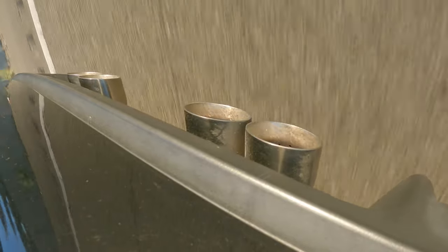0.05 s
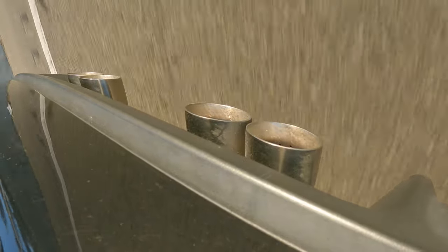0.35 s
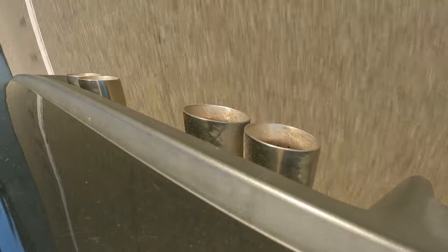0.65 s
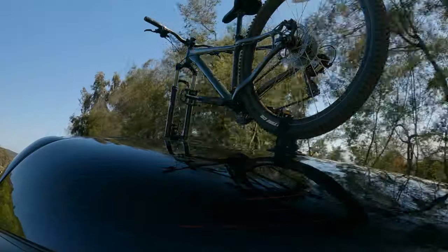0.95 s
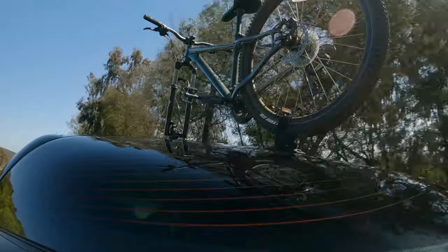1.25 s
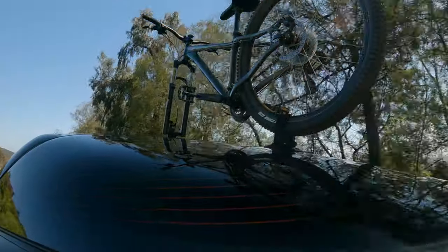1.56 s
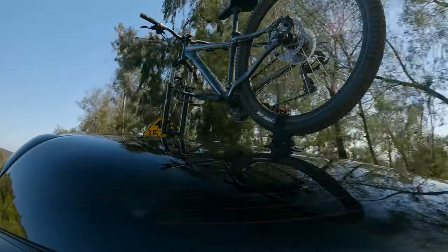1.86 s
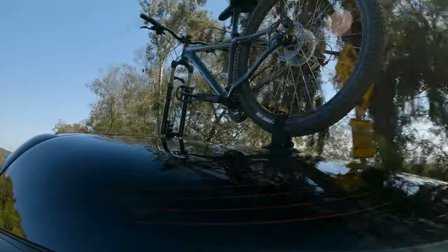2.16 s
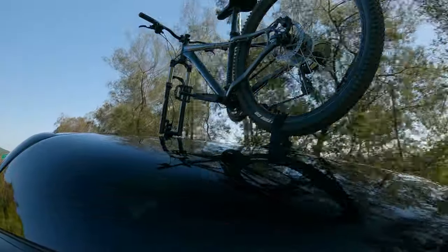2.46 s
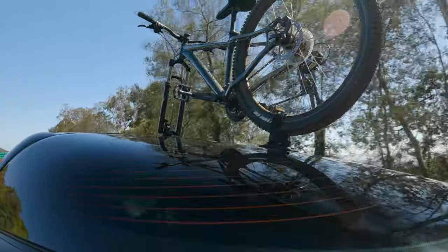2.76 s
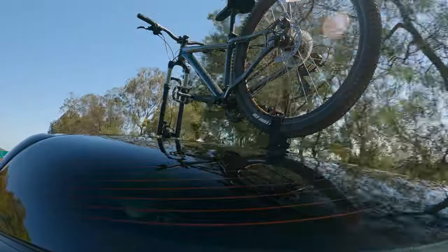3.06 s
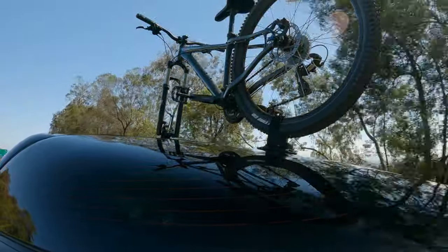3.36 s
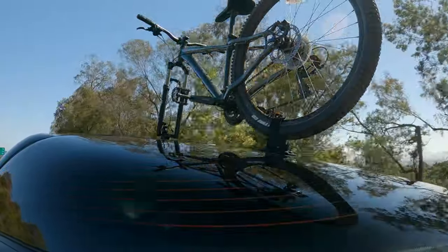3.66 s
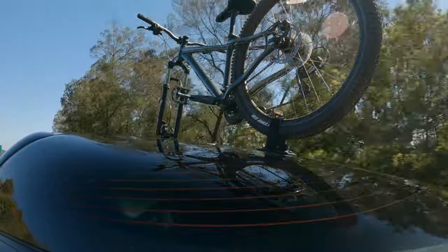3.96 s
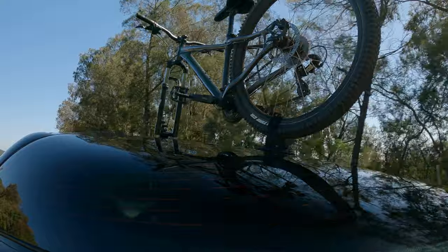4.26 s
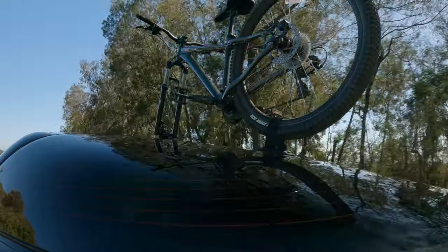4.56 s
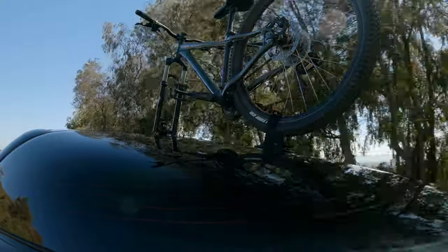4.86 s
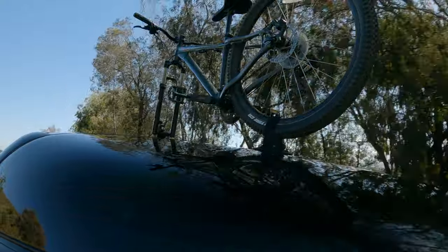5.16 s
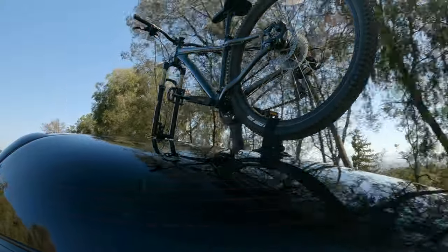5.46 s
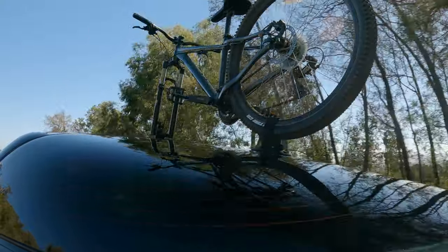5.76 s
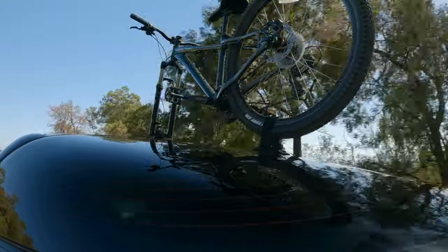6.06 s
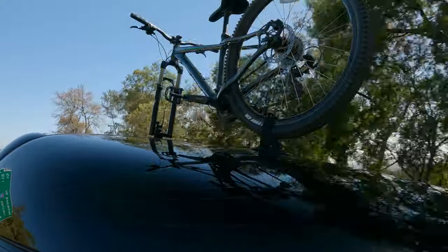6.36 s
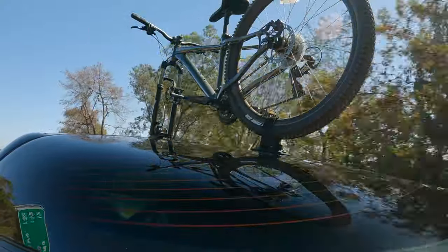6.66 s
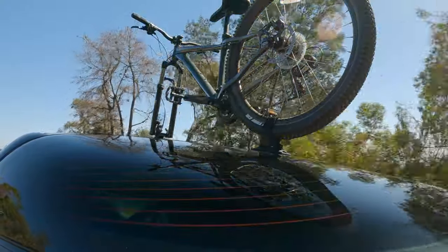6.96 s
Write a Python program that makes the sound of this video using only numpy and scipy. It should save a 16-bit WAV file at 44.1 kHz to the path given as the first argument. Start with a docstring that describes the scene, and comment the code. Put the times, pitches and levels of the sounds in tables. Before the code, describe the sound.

Brief, throaty car exhaust gives way to gusty wind rumbling and tearing at a microphone mounted by the roof at speed.

```python
"""V8 sports car, tailpipes then roof

Camera microphone, mounted on the car. Close over the tailpipes, uneven firings burble through the
pipes, the tips spit and the engine eases off a little. With a click the position changes to the roof,
in the open airstream: eddies buffet the microphone ports and grit ticks on the housing. Gusts drive
the wind's tearing and hiss, the smaller eddies following them most."""
import sys
import numpy as np
from scipy import signal
from scipy.fft import rfft, irfft, next_fast_len
from scipy.io import wavfile
from scipy.ndimage import uniform_filter1d, map_coordinates

SR = 44100
rng = np.random.default_rng(int(sys.argv[2]) if len(sys.argv) > 2 else 0)


def store_pcm(level_fs):
    """Save levels as 16-bit WAV."""
    pcm = np.round(np.clip(level_fs, -1, 1) * 32767).astype(np.int16)
    wavfile.write(sys.argv[1], SR, np.atleast_2d(pcm).T)


N = 309141

# Spectra give shape only. Levels and peaks are read before the trims in the functions.
# crankshaft speed: t/s, speed/(turns per s)
CRANK_SPEED = [(0.0, 36.8), (0.13, 36.4), (0.202, 36.5), (0.78, 35.0)]
# cylinders in firing order, each with its own path to the tips: pulse size, lateness/firing intervals
CYLINDERS = [(0.87, 0.015), (1.4, 0.247), (0.41, -0.22), (0.81, 0.09), (0.81, -0.0017), (1.33, 0.227),
             (0.82, -0.078), (1.2, 0.011)]
# resonances of muffler and tailpipes: f/Hz, level/dB
PIPE_SPECTRUM = [(15, -59), (25, -4.5), (48, -6.5), (97, 2), (149, -7), (182, 1), (229, -5), (275, -1),
                 (395, -11.5), (437, -25.5), (660, -10.5), (753, -14), (832, -29), (998, -22.5),
                 (1300, -45), (1690, -77), (2860, -120)]
# gas leaving the tips: f/Hz, level/dB
RASP_SPECTRUM = [(530, -32), (900, -7), (1040, -7), (1320, -11), (1740, -12), (1960, -15.5), (2120, -19),
                 (2810, -26.5), (3450, -29), (3890, -34), (4620, -33.5), (12000, -59.5), (15600, -101),
                 (22000, -120)]
# the exhaust swelling and sagging: t/s, boom level/dB, rasp level/dB
EXHAUST_SWELLS = [(0.02, 0.5, 1), (0.12, 1.5, 0), (0.17, -0.5, -1.5), (0.24, 2, -3), (0.33, -2.5, -1.5),
                  (0.39, 1.5, 1.5), (0.55, 0, -3), (0.68, -0.5, 1.5), (0.77, -1, -2.5)]
# engine orders on pipe resonances: t/s, 3rd order level/dB, 8th order level/dB
DRONE_LEVELS = [(0.0, -18.5, -8.5), (0.06, -15, -23.5), (0.15, -16, -24), (0.19, -26, -19),
                (0.235, -14, -29), (0.3, -39.5, -28), (0.35, -18.5, -10), (0.41, -14, -28.5),
                (0.47, -7.5, -16.5), (0.56, -27.5, -34), (0.6, -33, -16.5), (0.65, -10, -10.5),
                (0.72, -30, -18), (0.78, -28, -19)]
# hard firings that bark in the tailpipes: t/s, peak/dB
BARKS = [(0.102, -16.5), (0.137, -22), (0.186, -12), (0.271, -12), (0.304, -16), (0.549, -10), (0.583, -13),
         (0.752, -15.5)]
# tone of a bark: f/Hz, level/dB
BARK_SPECTRUM = [(400, -24.5), (580, -1), (740, 7.5), (900, -15), (1500, -18.5), (3000, -50), (8000, -100)]
# stereo image over the tailpipes: f/Hz, left-right likeness, left minus right/dB, left lead/rad
AT_PIPES = [(100, 0.98, -1, 0.0), (706, 1, -4, -0.15), (2400, 0.89, -3.5, -0.6), (4500, 0.7, -2.5, -.35),
            (10000, .9, 0, 0.0)]

# spits from the exhaust tips, then grit on the roof: t/s, tick peak/dB, glassy edge peak/dB
TICKS = [(0.1384, -44.5, -64), (0.221, -43, -55.5), (0.3904, -46.5, -64), (0.501, -36, -67.5),
         (0.6664, -42, -61), (0.9233, -37, -69), (0.9592, -37.5, -74), (1.5196, -40, -67),
         (1.533, -38.5, -63), (1.5798, -40.5, -70), (1.7095, -31, -71), (1.8731, -42.5, -65),
         (1.9042, -38.5, -66), (1.9266, -41.5, -69), (2.0122, -35.5, -53), (2.0636, -42.5, -62),
         (2.073, -36.5, -65), (2.2735, -39.5, -70), (2.4564, -38, -68), (2.5396, -40.5, -69),
         (2.7701, -42.5, -73), (3.104, -38, -73), (3.4002, -41, -70), (3.5189, -36.5, -66),
         (3.811, -39, -67), (3.9519, -38.5, -68), (4.116, -40, -60), (4.4245, -41.5, -71),
         (4.7832, -42, -69), (4.81, -30.5, -68), (5.4263, -41, -72), (6.1825, -37, -64),
         (6.311, -40.5, -68), (6.4157, -38.5, -64)]
# tone of a tick and its rattle: f/Hz, level/dB
TICK_SPECTRUM = [(1500, -8.5), (3500, 3.5), (5500, 10), (7600, 3), (8600, -13), (12000, -31),
                 (14000, -56.5)]
# glassy edge of a tick: f/Hz, level/dB
EDGE_SPECTRUM = [(4000, -22.5), (7500, -2.5), (9500, -1), (12000, -6.5), (13500, -29)]
# click at the change of position: t/s, peak/dB
CLICK = [(0.7908, -15)]
# tone of that click: f/Hz, level/dB
CLICK_SPECTRUM = [(300, 7), (1500, 6), (3000, 7.5), (5000, 2), (10000, -3), (16000, -8)]

# stereo image on the roof: f/Hz, left-right likeness, left minus right/dB, left lead/rad
ON_ROOF = [(50, 0.26, -4, 1), (110, 0.48, -2, -0.23), (203, 0.4, -7, -1.03), (336, 1, -9.5, -1.24),
           (720, 0.86, -6, -1.5), (1270, 1, -0.5, -1.57), (3200, 0.7, 5, -1.55), (4100, 0.62, 10, -1.3),
           (4900, .38, 4, -1.4), (6300, .6, 3, 0.51), (12000, .55, 2, .1)]
# gusts passing the ports, about the usual airflow: t/s, level/dB
GUSTS = [(0.83, -0.5), (0.88, 4), (1.02, -4.5), (1.05, 4.5), (1.15, -7.5), (1.19, 1), (1.29, 6.5),
         (1.58, 2), (1.79, -1.5), (1.83, -6), (1.87, 0), (2.05, -2), (2.07, 5), (2.1, 0.5), (2.14, 6),
         (2.18, 3.5), (2.22, -0.5), (2.3, 2), (2.37, -1.5), (2.42, 4), (2.455, -9.5), (2.475, -1),
         (2.495, -19.5), (2.515, -4), (2.58, -5.5), (2.65, 2.5), (2.72, 1.5), (2.95, -1), (2.98, 1.5),
         (3.02, -3.5), (3.09, 2), (3.235, -0.5), (3.275, 9), (3.31, -5), (3.37, 0), (3.405, 7), (3.44, 2),
         (3.48, -0.5), (3.58, 2), (3.69, -0.5), (3.8, 4.5), (3.84, -1), (3.9, -2.5), (3.99, 3),
         (4.26, -0.5), (4.28, 4.5), (4.35, -1), (4.41, 4.5), (4.48, 1), (4.73, 5), (4.77, -0.5),
         (4.95, 4.5), (4.97, 0), (5.0, 7), (5.05, 0.5), (5.12, 8.5), (5.15, -3.0), (5.22, 4), (5.43, -1),
         (5.68, 1.5), (5.76, 7), (5.82, 6.5), (5.84, -0.5), (5.94, -2), (5.98, 5), (6.04, 8.5), (6.09, 5),
         (6.135, 7.5), (6.165, -7.5), (6.19, 0), (6.33, -3), (6.35, 4), (6.4, -3.5), (6.66, 5), (6.75, -3),
         (6.83, 7.5), (6.85, 3.5), (6.99, -1)]
# turbulence right at the ports: f/Hz, level/dB
AIR_SPECTRUM = [(11, -25.5), (18, -4.5), (53, 4), (181, -3), (276, -6), (778, -16.5), (1310, -21.5),
                (2840, -38), (5000, -39), (6500, -84.5), (11000, -120)]
# deep rumble of the largest eddies: t/s, level/dB
RUMBLE_LEVELS = [(0.83, -21.5), (1.03, -24), (1.09, -19), (1.19, -23.5), (1.54, -21), (1.61, -27.5),
                 (1.66, -21.5), (1.87, -22), (2.02, -22), (2.09, -24.5), (2.32, -22), (2.37, -25.5),
                 (2.58, -20), (2.68, -23.5), (2.99, -21.5), (3.49, -21), (3.53, -27.5), (3.6, -22.5),
                 (3.76, -24.5), (3.83, -19), (3.99, -27), (4.17, -22), (4.49, -23), (4.57, -23),
                 (4.62, -26), (4.75, -20), (4.9, -23.5), (5.06, -19.5), (5.1, -24), (5.23, -19),
                 (5.31, -25.5), (5.66, -20.5), (5.98, -24.5), (6.14, -20.5), (6.31, -22.5), (6.35, -28.5),
                 (6.39, -19.5), (6.66, -24), (6.85, -18.5), (6.99, -22)]
# buffeting of the middle-sized eddies: t/s, level/dB
BUFFET_LEVELS = [(0.83, -21.5), (1.01, -23.5), (1.04, -22.5), (1.13, -20.5), (1.18, -25), (1.42, -23),
                 (1.45, -18), (1.49, -21.5), (1.58, -19.5), (1.69, -22), (1.75, -25), (1.8, -22),
                 (1.95, -19.5), (2.03, -22), (2.19, -21), (2.38, -21), (2.4, -29.5), (2.43, -22),
                 (2.48, -23.5), (2.51, -24.5), (2.61, -26.5), (2.64, -22.5), (2.67, -24), (2.73, -22.5),
                 (2.99, -20), (3.04, -28), (3.08, -20.5), (3.32, -21.5), (3.56, -22), (3.58, -23),
                 (3.73, -20.5), (3.77, -24), (3.82, -20.5), (3.92, -24), (3.98, -28.5), (4.07, -24.5),
                 (4.11, -20.5), (4.2, -25.5), (4.23, -22.5), (4.38, -21.5), (4.64, -22), (4.69, -23),
                 (4.8, -18.5), (4.9, -25), (4.92, -22.5), (5.22, -21), (5.3, -22), (5.4, -22.5),
                 (5.56, -20), (5.74, -24), (5.88, -20.5), (5.92, -23), (6.13, -21.0), (6.17, -22),
                 (6.24, -19.5), (6.33, -23.5), (6.36, -18.5), (6.4, -24), (6.44, -20.5), (6.52, -20),
                 (6.55, -33), (6.6, -19), (6.64, -24), (6.72, -25), (6.82, -22), (6.89, -20.5),
                 (6.99, -23.5)]
# the finest, hissing part of the flow: f/Hz, level/dB
HISS_SPECTRUM = [(600, -8.5), (1500, 9.5), (2500, 7.5), (3200, 4), (4000, -2), (6000, -11), (7700, -17.5),
                 (8400, -23), (10300, -32), (12000, -41), (13200, -58.5)]
# tyres and distant air: f/Hz, level/dB
ROAD_SPECTRUM = [(700, 0.5), (4000, -2), (7700, -3.5), (8400, -13), (10500, -20), (13000, -46)]
# tiny snaps in the wind: f/Hz, level/dB
CRACKLE_SPECTRUM = [(500, 0), (1500, 5.5), (4000, 3), (7600, -1), (8600, -9.5), (11000, -18),
                    (13500, -41.5)]
# strong eddies hitting the ports: t/s, slap peak/dB, tearing peak/dB, tearing rise/s
STRONG_EDDIES = [(0.914, -21, -18, 0.012), (0.958, -13, -23, 0.00098), (0.985, -14.5, -20.5, 0.0012),
                 (1.049, -21, -28.5, 0.0067), (1.116, -10, -22.5, 0.00088), (1.257, -19.5, -18, .0012),
                 (1.786, -15, -19.5, 0.00078), (1.874, -18.5, -20, .0012), (2.422, -16, -20.5, 0.0056),
                 (2.440, -11, -19.5, 0.0013), (2.457, -11.5, -32, 0.0013), (2.474, -14.5, -19.5, .003),
                 (2.511, -20.5, -26, .003), (2.556, -10.5, -28, 0.0027), (2.623, -18.5, -25, .0012),
                 (2.765, -14.5, -23.5, 0.00098), (3.063, -15, -21, 0.0053), (3.146, -18, -22, 0.0022),
                 (4.227, -15, -21.5, .001), (4.362, -22, -17, .0012), (4.404, -15, -16.5, 0.0016),
                 (4.572, -24, -19, .002), (5.594, -22, -26, 0.0013), (6.242, -19, -19.5, 0.0013),
                 (6.351, -21.5, -19.5, .0012), (6.559, -15, -22, .002), (6.96, -16, -30.5, 0.0012)]
# large, slow eddies that thump without tearing: t/s, peak/dB
SLOW_EDDIES = [(1.348, -11.5), (1.452, -14), (1.574, -8), (1.937, -12), (2.461, -13), (3.186, -11),
               (3.544, -11.5), (3.947, -11), (3.989, -14.5), (4.031, -11.5), (4.113, -10), (4.161, -10),
               (4.22, -13), (4.282, -9.5), (4.497, -15), (4.632, -13), (5.491, -9.5), (5.884, -13.5),
               (6.346, -15.5), (6.71, -8), (6.757, -12)]


def amp(db):
    """Decibels to gain."""
    return 10 ** (np.asarray(db) / 20)


def unit(x):
    """Scaled to rms 1."""
    return x / np.sqrt(np.mean(x ** 2) + 1e-20)


def along(table, hz):
    """Each column after the frequency, read at hz on a log axis."""
    f, *columns = np.transpose(table)
    return [np.interp(np.log(hz + 1), np.log(f + 1), column) for column in columns]


def curves(table):
    """Each column after the time, one value per sample."""
    times, *columns = np.transpose(table)
    return [np.interp(np.arange(N) / SR, times, column) for column in columns]


def wobble(rate):
    """A smooth random curve of rms 1 with rate knots a second."""
    knots = rng.standard_normal(int(N * rate / SR) + 4)
    return unit(map_coordinates(knots, [np.arange(N) * rate / SR]))


def flutter(rate):
    """A wobble with its widest swings and slow drift taken out, rms 1."""
    quick = np.clip(wobble(rate), -2.2, 2.2)
    return unit(quick - uniform_filter1d(quick, size=SR // 14))


def steady(noise, window_s=0.06):
    """Evens out the slow swells of a noise and keeps its quick flutter, rms 1."""
    power = np.mean(np.atleast_2d(noise) ** 2, axis=0)
    for _ in range(2):
        power = uniform_filter1d(power, size=int(window_s * SR))
    return unit(noise / np.sqrt(np.abs(power) + 1e-9))


def coloured(x, spectrum):
    """x through a minimum-phase filter with the gains of a table of f/Hz, level/dB."""
    size = 2 * next_fast_len(N // 2 + SR // 8)
    gain_db, = along(spectrum, np.fft.rfftfreq(size, 1 / SR))
    cepstrum = irfft(np.log(amp(gain_db) + 1e-6))
    cepstrum[1:size // 2] *= 2
    cepstrum[size // 2 + 1:] = 0
    return irfft(rfft(x, size) * np.exp(rfft(cepstrum)), size)[..., :N]


def rush(spectrum, flutter_db=0):
    """A pair of unrelated coloured noises that flutter together, rms 1."""
    gain = amp(np.clip(flutter_db, -8.5, 10))
    return unit(coloured(rng.standard_normal((2, N)) * gain, spectrum))


def turbulence(low_hz, high_hz, flutter_db=0):
    """The eddies of one range of sizes, as a pair of noises, rms 1."""
    hz = np.geomspace(10, SR / 2, num=120)
    air_db, = along(AIR_SPECTRUM, hz)
    band_db = -10 * np.log10((1 + (low_hz / hz) ** 8) * (1 + (hz / high_hz) ** 8))
    return steady(rush(np.column_stack([hz, air_db + band_db]), flutter_db))


def bursts(times, peaks_db, noise, rise_s, unshared=0):
    """A short burst of a noise pair at each time; unshared scales the second noise."""
    noise = noise * [[1], [unshared]]
    t = np.arange(SR // 10) / SR
    track = np.zeros((2, N + len(t)))
    for time, peak_db, rise in zip(times, peaks_db, np.broadcast_to(rise_s, len(times))):
        start = max(round(time * SR), 0)
        envelope = (t / rise * np.exp(-t / rise)) ** 2
        burst = envelope * np.take(noise, start + np.arange(len(t)), axis=1, mode="wrap")
        track[:, start:start + len(t)] += amp(peak_db) * burst / np.abs(burst).max()
    return track[:, :N]


def snaps(times, peaks_db, spectrum):
    """One dry impulse at each time, in the shared signal of a pair."""
    spikes = np.bincount(np.round(times * SR).astype(int), amp(peaks_db), N)[:N]
    peak = np.abs(coloured(signal.unit_impulse(N), spectrum)).max()
    return np.array([coloured(spikes, spectrum) / peak, np.zeros(N)])


def microphone(pair, place):
    """Mixes a shared and an unshared signal into left and right, keeping the level of their middle."""
    size = next_fast_len(N + SR // 4)
    likeness, balance_db, lead = along(place, np.fft.rfftfreq(size, 1 / SR))
    angle = np.arccos(np.clip(likeness, 0, 1)) / 2
    shared, unshared = rfft(pair, size) * [np.cos(angle), np.sin(angle)]
    lean = amp(balance_db / 2) * np.exp(1j * lead / 2)
    left, right = (shared + unshared) * lean, (shared - unshared) / lean
    middle = np.hypot(np.cos(angle) * abs(lean + 1 / lean), np.sin(angle) * abs(lean - 1 / lean)) / 2
    return irfft(np.array([left, right]) / middle, size)[:, :N]


def drone(turns, sway_rad=0.2):
    """Three engine orders drone on pipe resonances; uneven firing unsettles their phase."""
    sway = sway_rad * np.array([wobble(21), wobble(30), wobble(30)])
    third, fifth, eighth = np.sin(2 * np.pi * np.outer([3, 5, 8], turns) + sway)
    third_db, eighth_db = curves(DRONE_LEVELS)
    fifth_db = -20 + 3 * wobble(24)
    return amp(third_db - 7) * third + amp(fifth_db) * fifth + amp(eighth_db - 0.1) * eighth


def exhaust(jitter=0.024, scatter_db=1.9, puff_s=0.0032):
    """Close over the tailpipes: four uneven firings a turn boom in the pipes and puff gas from the tips."""
    speed, = curves(CRANK_SPEED)
    turns = np.cumsum(speed) / SR
    firings = 4 * turns
    firing = np.arange(int(firings[-1]))
    size, lateness = np.array(CYLINDERS)[firing % len(CYLINDERS)].T
    timing, strength = rng.standard_normal((len(firing), 2)).T
    arrivals = np.interp(firing + lateness + jitter * timing, firings, np.arange(N)).astype(int)
    pulses = np.bincount(arrivals, size * amp(scatter_db * strength), N)
    # each pulse drives a puff of turbulent gas that dies before the next
    puffs = unit(signal.lfilter([1], [1, -np.exp(-1 / (puff_s * SR))], pulses))
    boom_db, rasp_db = curves(EXHAUST_SWELLS)
    ringing = unit(coloured(pulses, PIPE_SPECTRUM))
    boom = amp(boom_db - 13.5) * steady(ringing + rush(PIPE_SPECTRUM, 0.5 * puffs))
    rasp = amp(rasp_db - 32.5) * steady(rush(RASP_SPECTRUM, puffs + wobble(45)))
    barks = bursts(*np.transpose(BARKS), rush(BARK_SPECTRUM), rise_s=0.0023)
    return microphone(boom + rasp + barks + drone(turns), AT_PIPES)


def ticks():
    """Small sharp ticks: spits from the exhaust tips, then grit on the camera housing on the roof."""
    times, peak_db, edge_db = np.transpose(TICKS)
    attacks = snaps(times, peak_db + 2.5, TICK_SPECTRUM)
    rattles = bursts(times, peak_db - 3.5, rush(TICK_SPECTRUM), rise_s=0.0007, unshared=0.5)
    edges = bursts(times, edge_db + 5, rush(EDGE_SPECTRUM), rise_s=0.0008, unshared=0.5)
    return microphone(attacks + rattles + edges, ON_ROOF)


def click():
    """One sharp click, dead centre, as the microphone position changes."""
    time, peak_db = CLICK[0]
    snap = coloured(signal.unit_impulse(N, round(time * SR)), CLICK_SPECTRUM)
    return amp(peak_db + 2.5) * snap / np.abs(snap).max()


def wind():
    """On the roof, air on the ports: large eddies rumble and carry small ones that tear and hiss."""
    gust_db, = curves(GUSTS)
    buffet_db, = curves(BUFFET_LEVELS)
    rumble_db, = curves(RUMBLE_LEVELS)
    chop = amp(np.minimum(-0.54 * gust_db, 3))  # strong flow rushes smoothly, weak flow breaks up
    flow_db = gust_db + 0.62 * wobble(20)
    # shared flutter keeps eddies of different sizes in step
    swirl = 0.66 * flutter(45) + 2.0 * flutter(120) + 5.03 * flutter(320)
    lumps = 0.67 * flutter(30)
    rumble = amp(rumble_db - 1.5) * turbulence(21, 142, 1.3 * flutter(25))
    buffet_flutter_db = 0.44 * swirl + lumps + 1.43 * flutter(70)
    buffet = amp(buffet_db - 2.5) * turbulence(140.6, 672, buffet_flutter_db)
    tear_flutter_db = 0.46 * chop * swirl + 1.1 * lumps + 1.3 * flutter(250)
    tear = amp(0.44 * flow_db - 35.5) * turbulence(708, 2230, tear_flutter_db)
    fizz = 1.1 * flutter(60) + 0.81 * flutter(400) + 2.6 * wobble(1300)
    hiss = amp(flow_db - 45.5) * steady(rush(HISS_SPECTRUM, chop * (0.44 * swirl + fizz)))
    bed = rumble + buffet + tear + hiss + road()
    return microphone(bed + thumps() + slaps() + spits() + crackle(flow_db), ON_ROOF)


def road():
    """Farther off, an even hiss of tyres and air fills the lulls."""
    return amp(-61.5) * rush(ROAD_SPECTRUM, 2.1 * flutter(300))


def crackle(flow_db, per_s=47, spread_db=5):
    """Tiny random snaps at the ports, strongest where the flow is weak and breaks up."""
    spacing, strength = rng.random((500, 2)).T
    times = np.cumsum(-np.log(1 - spacing)) / per_s
    inside = times < N / SR
    times = times[inside]
    peak_db = -41.5 + spread_db * (2 * strength[inside] - 1)
    breakup_db = np.minimum(-1.3 * flow_db[(times * SR).astype(int)], 4.5)
    return snaps(times, peak_db + breakup_db, CRACKLE_SPECTRUM)


def slaps(width_s=0.0007, centre_s=0.00275):
    """A strong eddy crossing the ports is one smooth swing of pressure, up and then down."""
    times, peak_db, _, _ = np.transpose(STRONG_EDDIES)
    spikes = np.bincount(np.round(times * SR).astype(int), amp(peak_db), N)
    crossing = (np.arange(SR // 80) / SR - centre_s) / width_s
    swing = -crossing * np.exp((1 - crossing ** 2) / 2) * signal.windows.tukey(len(crossing), 0.1)
    return np.array([signal.fftconvolve(spikes, swing)[:N], np.zeros(N)])


def spits():
    """The strong eddies tear as they break up on the ports, in a short spit or a longer rasp."""
    times, _, peak_db, rise_s = np.transpose(STRONG_EDDIES)
    return bursts(times, peak_db, turbulence(600, 3800), rise_s, unshared=0.6)


def thumps():
    """A large eddy pushes on both ports for a few dull swings."""
    times, peak_db = np.transpose(SLOW_EDDIES)
    return bursts(times, peak_db - 1.5, turbulence(140, 400), rise_s=0.005, unshared=0.62)


def squeak(at_s=2.854, hz=2130, width_s=0.0035):
    """One tiny, soft-edged squeak, perhaps from the bike rack."""
    t = np.arange(N) / SR - at_s
    return amp(-34) * np.exp(-(t / width_s) ** 2 / 2) * np.sin(2 * np.pi * hz * t)


def scene(change_s=0.791, crossfade_s=0.042):
    """The tailpipe position gives way to the roof in a quick equal-power crossfade."""
    roof = np.clip((np.arange(N) / SR - change_s) / crossfade_s + 0.5, 0, 1)
    return np.sqrt(1 - roof) * exhaust() + np.sqrt(roof) * wind() + ticks() + squeak() + click()


def record(dry, ceiling=0.92, fade_in_s=0.003, top_hz=16300, rolloff_hz=1200):
    """The camera rounds off the highest peaks and keeps nothing above its band limit."""
    rounded = dry / (1 + np.abs(dry / ceiling) ** 6) ** (1 / 6)
    fade_in = np.minimum(np.arange(N) / SR / fade_in_s, 1)  # the sound fades in over a few milliseconds
    size = next_fast_len(N + SR // 4)
    passband = np.clip((top_hz - np.fft.rfftfreq(size, 1 / SR)) / rolloff_hz + 0.5, 0, 1)
    return irfft(rfft(rounded * fade_in, size) * passband, size)[:, :N]


dry = scene()
out = record(dry)
store_pcm(out)
```